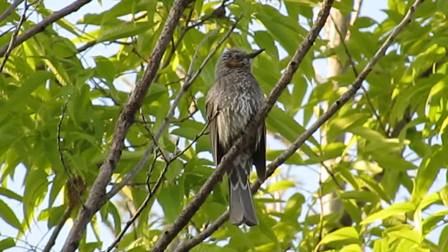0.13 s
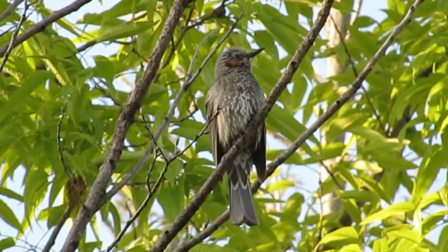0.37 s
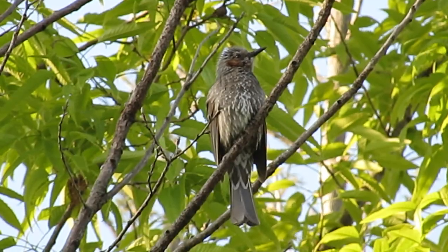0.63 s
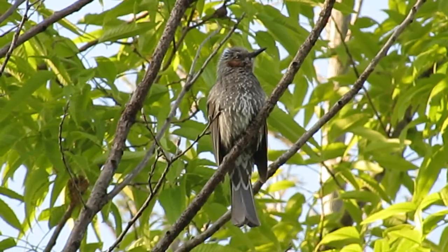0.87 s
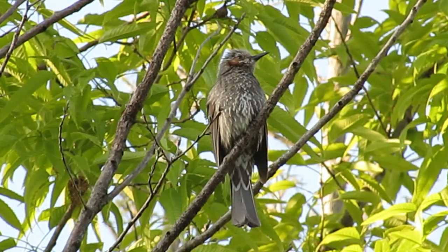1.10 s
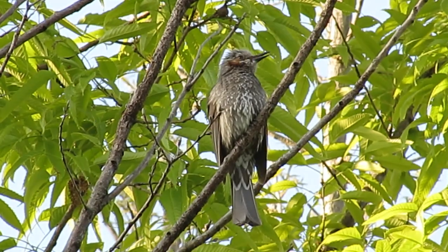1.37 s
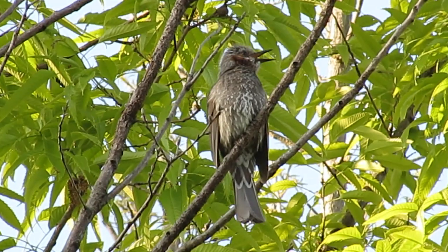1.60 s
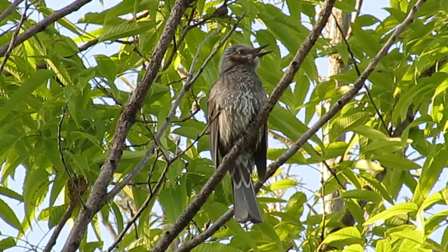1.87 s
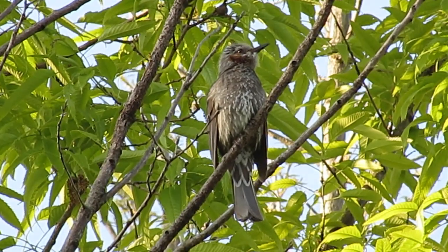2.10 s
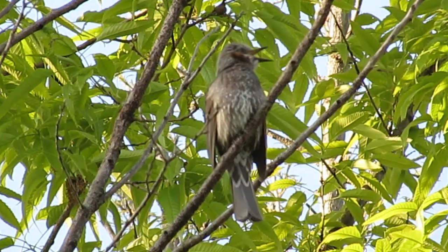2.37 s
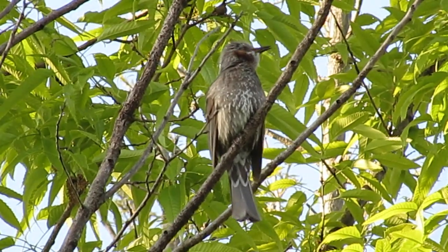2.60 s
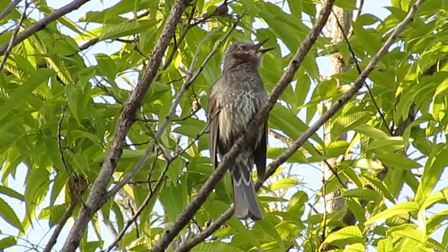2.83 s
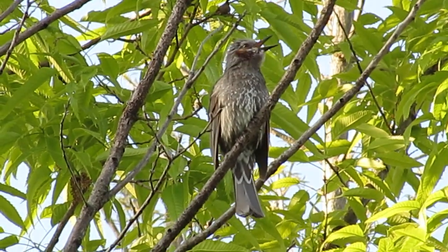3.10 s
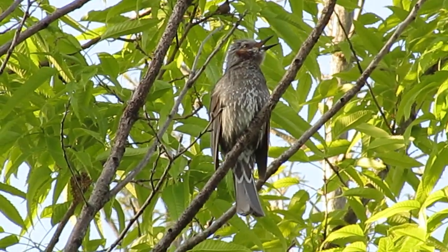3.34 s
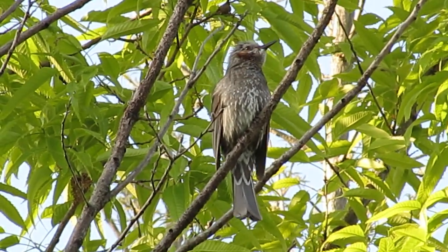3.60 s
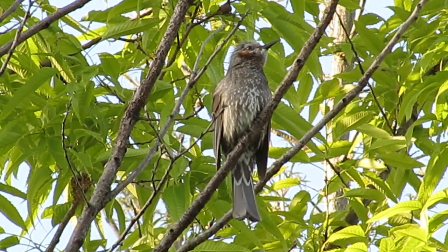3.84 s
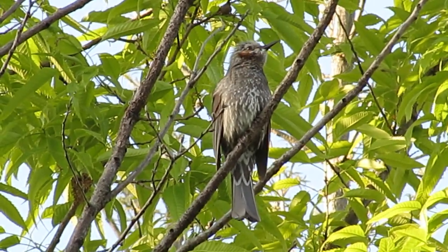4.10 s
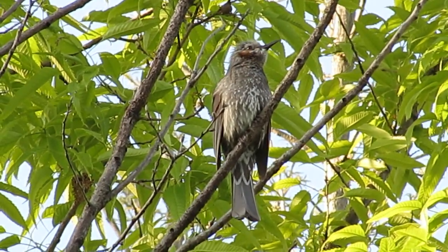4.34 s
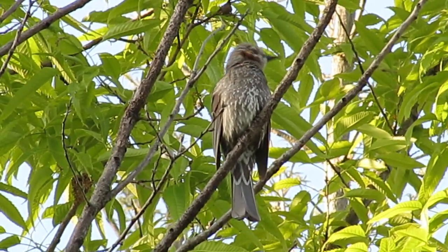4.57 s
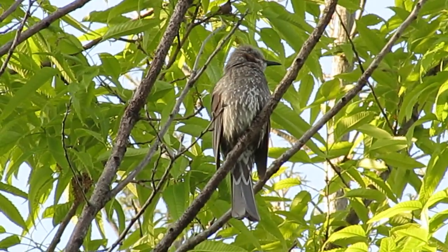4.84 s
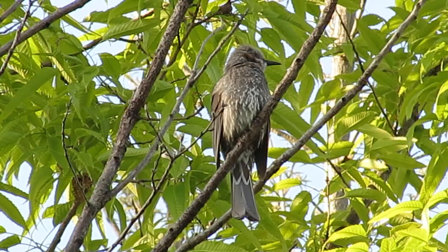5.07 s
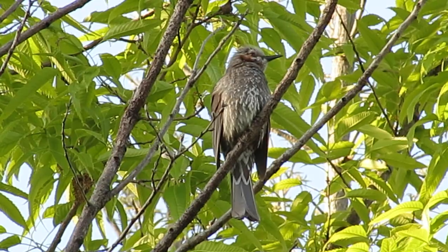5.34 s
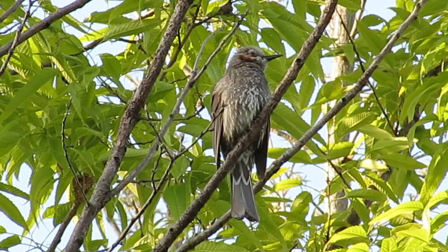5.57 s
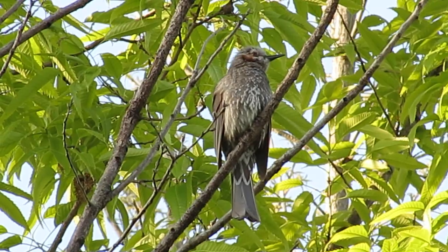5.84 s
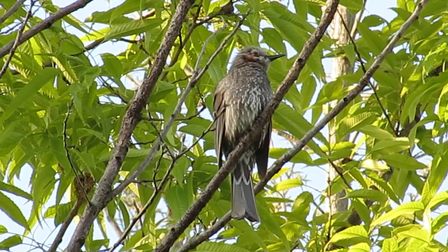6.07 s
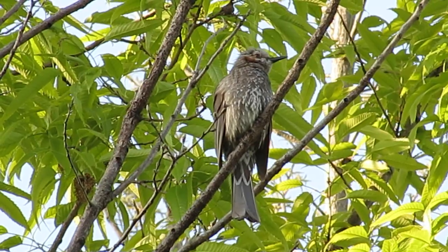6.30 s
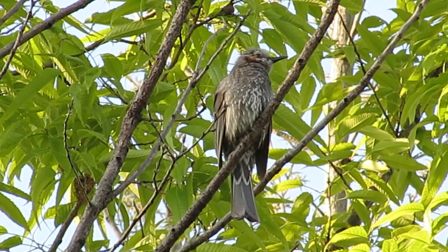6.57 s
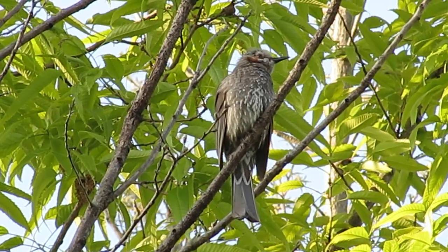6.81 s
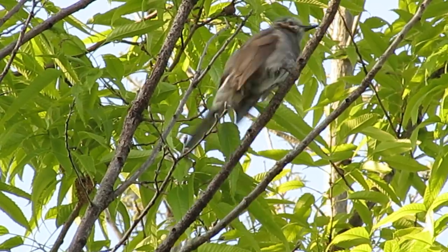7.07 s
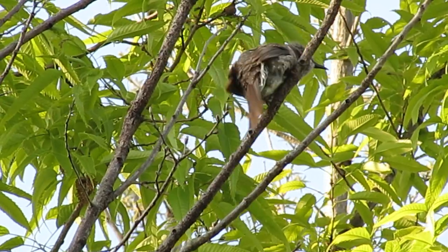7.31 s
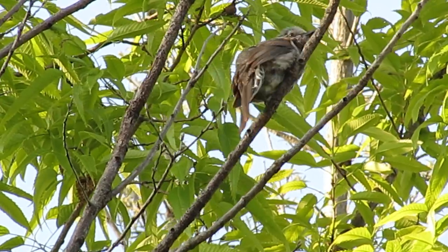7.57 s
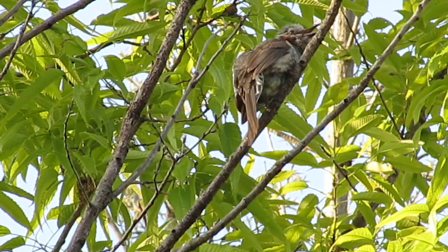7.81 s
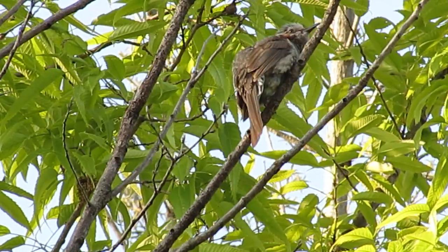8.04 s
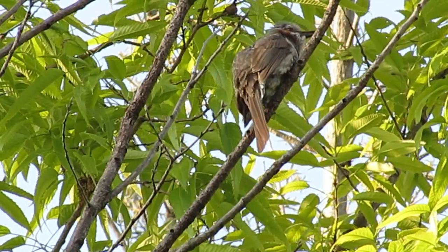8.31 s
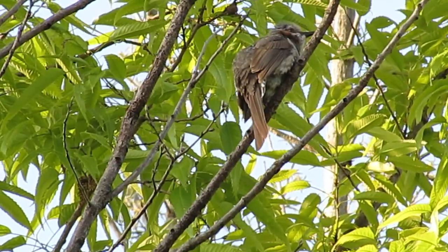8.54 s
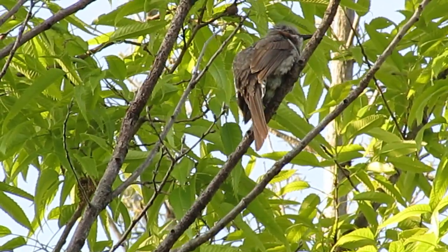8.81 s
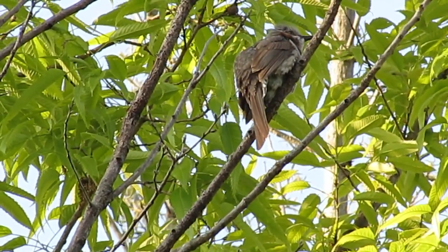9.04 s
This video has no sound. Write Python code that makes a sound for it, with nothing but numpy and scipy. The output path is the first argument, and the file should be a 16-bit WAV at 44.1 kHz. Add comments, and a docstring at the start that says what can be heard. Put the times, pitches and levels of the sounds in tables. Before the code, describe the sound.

A close songbird gives arching cries, buzzy two-toned phrases and a fading trill while a second bird whistles, over faint low traffic hum.

```python
"""A songbird calls close by: arching cries, buzzy climbs, two-voiced notes, flourishes and a dying trill.
A second bird whistles low rattles and warbles, and far birds chip; each voice is a gliding sine with haze and overtones.
Trees and walls throw the calls back as sparse reflections that die away.
Shaped noise makes the traffic hum, its swells and the wind in the leaves; short noise bursts are knocks close by."""
import sys
import numpy as np
from scipy import signal
from scipy.fft import rfft, irfft
from scipy.io import wavfile
from scipy.ndimage import uniform_filter1d

SR = 44100
rng = np.random.default_rng(int(sys.argv[2]) if len(sys.argv) > 2 else 0)


def output_pcm(signal):
    """Save a mono or channel-first signal as 16-bit PCM at the path in sys.argv[1].

    Samples are clipped to [-1, 1] before scaling.
    """
    pcm = np.clip(np.atleast_2d(signal).T, -1, 1) * 32767
    wavfile.write(sys.argv[1], SR, np.round(pcm).astype(np.int16))


def boost_factor(decibels):
    """Convert a level in decibels to a linear amplitude factor."""
    exponent = np.asarray(decibels, float) / 20
    return 10 ** exponent


N = 404397

# Colour of the hum. Each row: frequency in Hz, relative level in dB.
HUM_COLOUR = [(15, -34), (25, 2), (75, -2.5), (144, -4), (228, -9.5), (949, -18), (1240, -22), (3370, -28),
              (10700, -39.5), (14400, -43.5), (15600, -49)]
# Stereo likeness of the noise beds. Each row: frequency in Hz, left-right correlation.
STEREO_LIKENESS = [(60, 0.4), (150, -0.55), (300, -0.51), (700, 0.058), (1600, 0.0036), (4000, -0.052),
                   (15000, -0.0072)]
# Stereo lean of the noise beds. Each row: frequency in Hz, left over right in dB.
STEREO_LEAN = [(60, 2), (240, 0.5), (950, 0.5), (3770, -1.5), (15000, 2)]
# Passing tyres. Each row: time in seconds, level in dB.
TYRE_LEVEL = [(0.0, -54), (0.76, -57), (2.14, -54), (2.35, -56), (2.63, -44), (2.99, -54.5), (3.22, -47),
              (3.37, -48.5), (3.7, -53), (4.57, -61), (5.23, -57.5), (7.51, -59.5), (8.12, -55.5),
              (8.61, -53), (9.17, -52.5)]
# Colour of the tyre hiss. Each row: frequency in Hz, relative level in dB.
TYRE_COLOUR = [(150, -14.5), (400, -2.5), (800, -6.5), (1300, -9), (2500, -17.5), (6000, -24),
               (15000, -32.5)]
# Wind in the leaves. Each row: time in seconds, level in dB.
WIND_LEVEL = [(0, -83.5), (1, -89), (2, -68), (3.6, -59), (4.2, -65.5), (6, -73), (7.4, -76), (8.5, -80),
              (8.7, -63.5), (9.17, -61)]
# Colour of the leaves. Each row: frequency in Hz, relative level in dB.
LEAF_COLOUR = [(1500, -22), (3500, 2.5), (7000, -6.5), (11000, -9), (15800, -19)]
# Swells of a narrow traffic band. Each row: peak time in seconds, peak level in dB, rise and fall in dB per second.
DRONE_SWELLS = [(.28, -52, 60, 23), (2.35, -50.5, 47, 8), (2.63, -48.5, 36, 20), (3.36, -44.5, 55, 66),
                (5.41, -64, 18, 13), (8.5, -51.5, 40, 30)]
# Colour of that band. Each row: frequency in Hz, relative level in dB.
DRONE_COLOUR = [(700, -20), (920, -5), (1030, -0.5), (1150, -10), (1500, -63)]
# Faint distant chips. Each row: start in seconds, start and end pitch in Hz, length in seconds, level in dB.
FAR_CHIPS = [(0.044, 2310, 2480, 0.064, -73), (0.076, 3260, 3440, 0.08, -67),
             (0.247, 3000, 2335, 0.065, -72), (0.317, 2300, 1990, 0.1, -71), (0.326, 4150, 4130, .03, -70),
             (0.465, 3140, 3540, 0.021, -70), (0.782, 2800, 2800, 0.023, -73),
             (4.143, 1250, 1260, 0.077, -62), (5.425, 3520, 3320, 0.027, -62.5),
             (5.909, 3940, 3440, 0.023, -62), (6.668, 3960, 3400, 0.0286, -72),
             (6.975, 3090, 3200, 0.012, -64), (7.239, 3290, 3340, 0.028, -61),
             (7.357, 3300, 3930, 0.033, -68.5), (8.475, 1530, 2890, 0.0123, -56)]
# Far call, one table a part. Each row: seconds after its start, pitch in Hz, relative level in dB.
FAR_CALL_PARTS = [
    [(0, 7030, 1), (.02, 6900, 0), (.05, 7430, 0)],
    [(.05, 6980, 1), (.09, 5550, 0.5), (.18, 5250, -8)],
    [(.09, 7100, 3.5), (.24, 6890, -10)],
]
# Far call cues. Each row: start in seconds, level in dB.
FAR_CALL_CUES = [(.71, -61.5), (8.86, -61.5)]
# Treble dims from call to call as the head turns. Each row: time in seconds, dB lost per kHz above 4 kHz.
HEAD_TURN = [(1.5, 2.14), (2.1, 1), (2.5, 2), (2.9, 0.44), (3.2, 0.17), (3.5, 1.15), (6.1, 1.5), (7.8, 2.8),
             (8.3, 3.2)]
# Decay off nearby leaves and branches. Each row: frequency in Hz, seconds to fall by 60 dB.
LEAF_DECAY = [(500, 0.1), (2500, 0.12), (6000, 0.13), (12000, 0.16)]
# Decay off far trees and walls. Each row: frequency in Hz, seconds to fall by 60 dB.
FAR_DECAY = [(500, 0.15), (2500, 0.72), (5000, 0.61), (10000, 0.043)]
# Knocks. Each row: start in seconds, body peak in dB, tick in dB relative to that peak,
# left over right in dB, dullness in dB per octave above 250 Hz.
KNOCK_HITS = [(1.02, -34, -23, -6.5, -4), (1.053, -24, -25, -4, 2.5), (1.653, -21, -34, -2, -2.5),
              (1.73, -26, -35, -1, 1.5), (2.31, -19.5, -28, -2, 6.5), (2.487, -26.5, -24, -7, -1.5),
              (2.629, -28, -18, -2, 1), (2.954, -32, -18, -15, 12), (2.981, -22.5, -19, -2, 8),
              (2.995, -32, -16, -1, 7), (3.017, -29.5, -20, -1.5, 8), (3.287, -30, -27, 3, 5.5),
              (6.527, -43, -7, 7, 7), (6.546, -38, -31, 4, 8), (8.513, -42.5, -32, 9, 10),
              (8.865, -49, 0, 2.5, 0)]
# Colour of a knock's body. Each row: frequency in Hz, relative level in dB.
KNOCK_COLOUR = [(88, -61), (150, -15), (524, -6), (791, -10), (1390, -3), (1640, -12.5), (2220, -13.5),
                (4000, -29), (5200, -59), (8800, -120)]
# Leaves or feathers shaken. Each row: time in seconds, level in dB.
RUSTLE_LEVEL = [(7.62, -65), (7.628, -57.5), (7.698, -55), (7.72, -63)]
# Arching cry. Each row: seconds after its start, pitch in Hz, relative level in dB.
ARCH_SHAPE = [(0, 987, -11), (.008, 1639, -2.5), (.015, 1800, -1), (.043, 2023, 0.5), (.085, 2218, -3),
              (.13, 2250, 3), (.195, 2100, -1.5), (.215, 1883, -1), (.225, 1432, -9), (.232, 1120, -14)]
# Arch cues. Each row: start in seconds, level in dB, time stretch, pitch factor.
ARCH_CUES = [(1.502, -38.5, 1.005, 1.007), (2.409, -36, 1.02, 1.015), (7.765, -36.5, .957, 1.01)]
# Arch overtones. Each row: multiple of the pitch, relative level in dB.
ARCH_OVERTONES = [(1, -42), (2, 2), (3, -12), (4, 0), (5, -15.5), (6, -12)]
# Rich rise that opens a flourish. Each row: seconds after its start, pitch in Hz, relative level in dB.
RISE_SHAPE = [(0, 1614, -16.5), (.013, 1808, -7), (.024, 2207, -17.5), (.04, 2634, -3.5)]
# Rise overtones. Each row: multiple of the pitch, relative level in dB.
RISE_OVERTONES = [(1, 0), (1.5, -7), (2, 2), (3, -4.5), (4, -12)]
# Quick glides of a flourish, one table a glide. Each row: seconds after its start, pitch in Hz, relative level in dB.
FLOURISH_GLIDES = [
    [(.04, 2750, 2.5), (.047, 4800, -5), (.059, 6250, 5), (.07, 7000, -2.5), (.09, 7030, -11),
     (.12, 7480, -15), (.146, 7450, -7)],
    [(.052, 2920, -18), (.063, 3200, -10), (.085, 3515, -1), (.105, 3718, 1.5), (.14, 3760, 0),
     (.158, 3750, -16), (.167, 3530, -12)],
    [(.142, 4050, -15), (.149, 4700, -15), (.157, 4840, -11)],
    [(.171, 6300, 7), (.174, 6100, 7), (.178, 4530, -7), (.182, 2440, -16), (.184, 1780, -14)],
    [(.189, 3840, -2), (.2, 4760, -1.3)],
    [(.204, 3175, -6), (.215, 2680, 7)],
    [(.22, 2430, -1), (.23, 3216, 5), (.243, 2940, -11), (.257, 3410, -2)],
]
# Flourish cues. Each row: start in seconds, level in dB, time stretch, pitch factor.
FLOURISH_CUES = [(1.913, -38, .918, 1.025), (8.203, -42.5, 0.99, .98)]
# Glide overtones. Each row: multiple of the pitch, relative level in dB.
GLIDE_OVERTONES = [(1, 1), (2, -15), (3, -20)]
# Lines held under the trill, one table a line. Each row: time in seconds, pitch in Hz, level in dB.
HELD_LINES = [
    [(6.12, 5450, -52), (6.201, 5660, -52), (6.3, 5500, -54), (6.551, 5480, -57.5), (6.78, 5490, -70)],
    [(6.29, 3450, -66.5), (6.44, 3510, -63)],
]
# Flick that opens a phrase. Each row: seconds after the phrase's start, pitch in Hz, relative level in dB.
FLICK_SHAPE = [(0, 2466, -8), (.007, 2620, -1.5), (.016, 3320, -9.5)]
# Buzzy climb after the flick. Each row: seconds after the phrase's start, pitch in Hz, relative level in dB.
CLIMB_SHAPE = [(.02, 2260, -10), (.042, 2341, -2), (.052, 2500, -2), (.084, 3220, 2.5), (.11, 3340, 0.5),
               (.119, 3103, 1), (.121, 2920, -6), (.127, 1616, -2), (.129, 1350, 3)]
# Climb overtones. Each row: multiple of the pitch, relative level in dB.
CLIMB_OVERTONES = [(2, 2), (3, -29.5)]
# Held low side of the syrinx. Each row: seconds after the climb's end, pitch in Hz, relative level in dB.
LOW_SIDE_HOLD = [(0, 2300, -2.5), (.015, 2228, -5.5), (.034, 2230, -5)]
# Fall of the low side. Each row: seconds after the phrase's start, pitch in Hz, relative level in dB.
LOW_SIDE_FALL = [(.192, 1961, -1), (.201, 1826, -5.5), (.21, 1270, -5), (.212, 1220, -11)]
# High side of the syrinx. Each row: seconds after the low side's start, pitch in Hz, relative level in dB.
HIGH_SIDE_SHAPE = [(0, 3398, 8), (.03, 3300, 8.5), (.045, 3310, -1), (.062, 3230, -42)]
# Phrase cues. Each row: start in seconds, level of the climb, low side and high side in dB, stretch of the held part.
PHRASE_CUES = [(2.775, -35, -43.5, -45, 0.89), (3.08, -34.5, -45, -43, 0.827),
               (3.385, -36.5, -47.5, -48, 1.16)]
# Sum tones of a phrase. Each row: multiple of the low side, multiple of the high side, relative level in dB.
DUET_SUMS = [(1, 0, -1.5), (2, 0, 6.5), (3, 0, -4), (0, 1, 1), (1, 1, -0.5), (0, 2, -27), (2, 1, 1.5),
             (1, 2, -8), (3, 1, -5.5), (2, 2, -23), (4, 1, -18), (3, 2, -22.5)]
# Low side of a two-voiced chirp. Each row: time in seconds, pitch in Hz, level in dB.
CHIRP_LOW_SIDE = [(5.985, 2070, -54), (6.009, 3150, -45.5), (6.025, 3594, -39.5), (6.056, 3330, -44),
                  (6.082, 3520, -48), (6.095, 3280, -55), (6.11, 3680, -57)]
# High side of the chirp. Each row: time in seconds, pitch in Hz, level in dB.
CHIRP_HIGH_SIDE = [(5.986, 4260, -72), (6.001, 4700, -58), (6.02, 4990, -58), (6.06, 4870, -53),
                   (6.11, 4790, -68)]
# Sum tones of the chirp. Each row: multiple of the low side, multiple of the high side, relative level in dB.
CHIRP_SUMS = [(1, 0, 0), (0, 1, -3), (2, 0, -4), (1, 1, 2), (3, 0, -19), (2, 1, -8)]
# Hooked and sliding whistles, one table a note. Each row: time in seconds, pitch in Hz, level in dB.
WHISTLE_NOTES = [
    [(1.82, 1702, -50), (1.839, 2385, -36.5), (1.853, 1600, -44), (1.88, 1607, -44), (1.92, 1964, -33),
     (1.937, 1966, -38), (1.945, 1880, -59)],
    [(2.05, 2793, -49), (2.084, 2750, -30), (2.1, 2617, -33), (2.13, 2550, -43), (2.141, 2498, -26.5),
     (2.173, 2410, -36), (2.2, 2360, -39.5), (2.24, 2284, -45)],
    [(2.607, 3020, -42), (2.622, 2933, -30), (2.644, 2715, -26.5), (2.67, 2404, -30.5),
     (2.685, 2055, -38.5)],
    [(3.065, 1750, -49), (3.08, 2290, -35), (3.091, 1860, -46), (3.101, 1647, -39.5), (3.129, 1553, -47),
     (3.16, 1776, -37.5), (3.19, 1685, -45)],
    [(5.492, 2700, -38), (5.507, 2720, -34.5), (5.538, 2453, -34), (5.557, 2250, -30.5), (5.6, 2300, -38),
     (5.65, 2323, -37), (5.69, 2318, -34.5), (5.715, 2126, -47.5)],
]
# Whistle overtones. Each row: multiple of the pitch, relative level in dB.
WHISTLE_OVERTONES = [(1, 1), (2, -40)]
# Level flutter of the whistles. Each row: time in seconds, flutter in dB.
FLUTTER_BY_TIME = [(2.1, 3), (2.44, 3.5), (2.6, 1.5), (5.4, 2), (5.5, 4.5)]
# Low rattled whistle. Each row: time in seconds, centre pitch in Hz, level in dB.
RATTLE_SHAPE = [(2.435, 1793, -46), (2.461, 1738, -35.5), (2.503, 1890, -39), (2.525, 2000, -51)]
# Opening swings of a warble. Each row: seconds after its start, pitch in Hz, relative level in dB.
WARBLE_OPENING = [(0, 1635, -24), (.0055, 3120, -9.5), (.012, 1755, -17.5), (.0185, 2954, -4.5),
                  (.025, 1930, -9.5), (.032, 2490, -2.5), (.046, 2452, 0)]
# Warble cues. Each row: start in seconds, level in dB, length in seconds, first dip in seconds after the start,
# seconds between dips, number of dips, closing pitch in Hz.
WARBLE_CUES = [(4.226, -33, .2, 0.062, 0.01, 3, 2139), (4.634, -30.5, 0.21, 0.064, 0.015, 4, 2018),
               (5.117, -30.5, 0.21, .068, .0155, 3, 2056)]
# Wide trill narrowing to one line. Each row: time in seconds, centre pitch in Hz, level in dB, swing in Hz.
TRILL_SHAPE = [(6.112, 7180, -48, 1350), (6.16, 7400, -42, 1160), (6.22, 7300, -43, 570),
               (6.3, 6750, -43, 170), (6.36, 6690, -46.5, 43), (6.57, 6350, -55.5, 23),
               (6.7, 6340, -54, 21), (6.76, 6270, -74, 20)]


def evened(x):
    """Scales to rms 1."""
    return x / np.sqrt(np.mean(x ** 2) + 1e-20)


def read(points, hz):
    """Reads a table on a log-frequency axis."""
    f, value = np.transpose(points)
    return np.interp(np.log(hz + 1), np.log(f + 1), value)


def coloured(x, spectrum):
    """Filters x through a table of gains over frequency."""
    return irfft(rfft(x) * boost_factor(read(spectrum, np.fft.rfftfreq(len(x), 1 / SR))), len(x))


def add(mix, s, sound, pan_db=0):
    """Mixes a sound in at time s, with the left louder than the right by pan_db."""
    part = mix[:, round(s * SR):][:, :len(sound)]
    part += boost_factor([[pan_db / 2], [-pan_db / 2]]) * sound[:part.shape[1]]


def wobble(size, hz):
    """Random drift of about rms 1, with changes up to about hz."""
    span = int(SR / hz) + 1
    noise = rng.standard_normal(1 << 15)
    return evened(uniform_filter1d(uniform_filter1d(noise, span), span))[:size]


def columns(rows, s0=None, s1=None):
    """Time and the smoothed columns of a table at sample rate."""
    s, *rest = np.transpose(rows)
    t = np.arange(s0 or s[0], s1 or s[-1], 1 / SR)
    return [t] + [uniform_filter1d(np.interp(t, s, c), size=90, mode="nearest") for c in rest]


def placed(shape, s, db, stretch=1, pitch=1):
    """Moves a shape to time s and level db."""
    return [(s + stretch * after, pitch * hz, db + rel) for after, hz, rel in shape]


def soft_ends(t):
    """Fades in and out over 0.68 ms."""
    return np.clip(np.minimum(t - t[0], t[-1] - t) / 0.00068, 0, 1)


def wide_noise(spectrum, patchy_db):
    """Random short-time spectra with drifting patches, partly alike in both channels, at rms 1."""
    frames, hz = N // 256 + 5, np.fft.rfftfreq(1024, 1 / SR)
    a, b, c, d, patches = rng.standard_normal((frames, 513, 5)).T
    patches = uniform_filter1d(patches, size=10, axis=0)
    patches = evened(uniform_filter1d(patches, size=16, axis=1))
    same = np.clip(read(STEREO_LIKENESS, hz), -1, 1)[:, None]
    left, other = a + 1j * b, c + 1j * d
    z = np.array([left, same * left + np.sqrt(1 - same ** 2) * other])
    z *= boost_factor(read(spectrum, hz)[:, None] + patchy_db * patches)
    z *= boost_factor(read(STEREO_LEAN, hz) * np.array([[.5], [-.5]]))[:, :, None]
    return evened(signal.istft(z, nperseg=1024, noverlap=768)[1][:, :N])


def background():
    """A steady hum, a narrow swelling traffic band, the hiss of passing tyres and wind in the leaves."""
    t = np.arange(N) / SR
    tyre_db = np.interp(t, *np.transpose(TYRE_LEVEL))
    wind_db = np.interp(t, *np.transpose(WIND_LEVEL))
    swells = [db - np.maximum(rise * (s - t), fall * (t - s)) for s, db, rise, fall in DRONE_SWELLS]
    drone_db = np.maximum(np.max(swells, axis=0), -78.5)  # never quieter than this floor
    hum = boost_factor(-48) * wide_noise(HUM_COLOUR, 1.18)
    drone = boost_factor(drone_db) * wide_noise(DRONE_COLOUR, 0.47)
    tyres = boost_factor(tyre_db) * wide_noise(TYRE_COLOUR, 1.66)
    leaves = boost_factor(wind_db) * wide_noise(LEAF_COLOUR, 5.0)
    return hum + drone + tyres + leaves


def sing(t, hz, db, flutter_db, jitter, rasp_db=-20):
    """One membrane tone that wavers in pitch and level, inside a haze of turbulent air."""
    turns = np.cumsum(hz * (1 + jitter * wobble(len(t), 450))) / SR
    dim_db = np.interp(t[0], *np.transpose(HEAD_TURN)) * np.maximum(hz / 1000 - 4, 0)
    mean_lift_db = flutter_db ** 2 * np.log(10) / 20  # offsets the power that flutter adds
    level = boost_factor(db - dim_db + flutter_db * wobble(len(t), 315) - mean_lift_db)
    level = level * (hz < 16000)
    haze = 1 + boost_factor(rasp_db) * wobble(len(t), 2500)
    return np.sqrt(2) * level * haze * soft_ends(t) * np.sin(2 * np.pi * (turns + rng.random()))


def note(rows, tones, flutter_db, jitter, rasp_db, puff_db, buzz=0):
    """A harmonic note; air puffs out when the pitch jumps, and buzz shakes the upper part of a climb."""
    t, hz, db = columns(rows)
    jump = np.clip(abs(np.gradient(np.log(hz))) * SR / 60, .1, 1)
    puff = boost_factor(db + puff_db) * jump * soft_ends(t) * wobble(len(t), 15000)
    climbing = np.gradient(hz) > -.05
    shaking = np.clip(hz / 2330 - 1, 0, .15) / 0.22 * climbing  # sets in above 2330 Hz
    shake = uniform_filter1d(shaking, size=200) * np.sin(2 * np.pi * 238 * t)  # 238 Hz
    hz = hz * (1 + buzz * shake)
    voice = sum(sing(t, k * hz, db + rel, flutter_db, jitter, rasp_db) for k, rel in tones)
    return t[0], np.diff(puff, prepend=0) + voice


def distant_birds():
    """Hazy far calls and short chips, each a single wavering tone."""
    mix = np.zeros((2, N))
    calls = [placed(part, *cue) for cue in FAR_CALL_CUES for part in FAR_CALL_PARTS]
    chips = [[(s, hz0, db - 4.5), (s + length / 2, (hz0 + hz1) / 2, db), (s + length, hz1, db - 3)]
             for s, hz0, hz1, length, db in FAR_CHIPS]
    for rows in calls + chips:
        add(mix, *note(rows, [(1, 0)], 2.1, 0.011, -3.5, -60))
    return mix


def echoes(x, t60, shared):
    """Sparse reflections of random sign die band by band; three random tails fade in and out in turn to avoid ringing."""
    hz, t, _ = signal.stft(np.zeros(SR), SR, nperseg=128)
    decay = boost_factor(-60 * t / read(t60, hz)[:, None])
    out = 0
    for k in range(3):
        taps = np.zeros((3, SR))  # left, right and shared reflections
        at = np.arange(120, SR - 20, 20) + rng.integers(0, 20, (3, (SR - 121) // 20))
        np.put_along_axis(taps, at, rng.choice([-1., 1.], at.shape), 1)
        z = signal.stft(taps[:2] + shared * taps[2], SR, nperseg=128)[2]
        tail = signal.istft(z * decay, SR, nperseg=128)[1]
        tail = tail / np.linalg.norm(tail[0])
        turn = np.sqrt(2 / 3) * np.cos(np.pi * (7 * np.arange(N) / SR + k / 3))
        out = out + signal.fftconvolve((x.mean(0) * turn)[None], tail, axes=1)[:, :N]
    return out


def knocks():
    """Short noise bursts with a tick at the start, each microphone port shaking in its own way; also a rustle."""
    mix, t = np.zeros((2, N)), np.arange(2048) / SR
    fade = np.exp(-(t / 0.011) ** 2) * np.minimum(t * 2000, 1)
    shape = fade * (1 + 0.62 * np.exp(-t / 0.00084))
    noises = rng.standard_normal((len(KNOCK_HITS), 2, 2048))
    for (s, db, tick_db, pan_db, dull_db), noise in zip(KNOCK_HITS, noises):
        ports = np.array([noise[0], 0.8 * noise[1] - 0.18 * noise[0]])
        colour = [(hz, rel - dull_db * np.log2(max(hz, 250) / 250)) for hz, rel in KNOCK_COLOUR]
        body = np.array([coloured(port, colour) for port in ports]) * shape
        tick = evened(np.diff(ports[0], prepend=0)) * np.exp(-t / 0.0029)
        level = boost_factor(db + np.array([[pan_db / 2], [-pan_db / 2]]))
        mix[:, round(s * SR):][:, :2048] += level * (body / abs(body).max() + boost_factor(tick_db) * tick)
    t, db = columns(RUSTLE_LEVEL)
    rustle = coloured(rng.standard_normal(len(t)), [(900, -40), (1500, 12), (3000, 4.0), (4500, -24.5)])
    add(mix, t[0], boost_factor(db) * evened(rustle) * signal.windows.tukey(len(t), .3))
    return mix


def near_bird():
    """Membrane tones in arches, flourishes, three-part phrases, a two-voiced chirp and the trill."""
    mix = np.zeros((2, N))
    glides = HELD_LINES + [placed(part, *cue) for cue in FLOURISH_CUES for part in FLOURISH_GLIDES]
    for cue in ARCH_CUES:
        add(mix, *note(placed(ARCH_SHAPE, *cue), ARCH_OVERTONES, 1.2, 0.0056, -57.0, 2.1), pan_db=2.5)
    for cue in FLOURISH_CUES:
        add(mix, *note(placed(RISE_SHAPE, *cue), RISE_OVERTONES, 0.44, 0.0011, -18, -8), pan_db=3.0)
    for rows in glides:
        add(mix, *note(rows, GLIDE_OVERTONES, 0.72, 0.0085, -19, 2), pan_db=2.0)
    for s, climb_db, low_db, high_db, stretch in PHRASE_CUES:
        flick = placed(FLICK_SHAPE, s, climb_db)
        climb = placed(CLIMB_SHAPE, s, climb_db)
        hold = placed(LOW_SIDE_HOLD, s + CLIMB_SHAPE[-1][0], low_db, stretch)
        low = hold + placed(LOW_SIDE_FALL, s, low_db)
        high = placed(HIGH_SIDE_SHAPE, low[0][0], high_db, stretch)
        add(mix, *note(flick, GLIDE_OVERTONES, 1.1, 0.0066, -7, -1), pan_db=-2.0)
        add(mix, *note(climb, CLIMB_OVERTONES, 1.9, 0.0071, -18, 1.5, buzz=0.048), pan_db=1.0)
        add(mix, *duet(low, high, DUET_SUMS, 2.14, 0.0076), pan_db=1.5)
    add(mix, *duet(CHIRP_LOW_SIDE, CHIRP_HIGH_SIDE, CHIRP_SUMS, 2.4, .016), pan_db=2.0)
    add(mix, *trill(), pan_db=3.0)
    return mix


def whistler():
    """A second bird, nearly pure in tone, with a thin hiss high above."""
    mix = np.zeros((2, N))
    for rows in WHISTLE_NOTES + [rattle()] + [warble(*cue) for cue in WARBLE_CUES]:
        flutter_db = np.interp(rows[0][0], *np.transpose(FLUTTER_BY_TIME))
        add(mix, *note(rows, WHISTLE_OVERTONES, flutter_db, 0.0055, -30.5, -62), pan_db=-2.0)
        t, _, db = columns(rows)
        hiss = sing(t, 10800 + 0 * t, db - 36, 2, 0.0316, 6.1)
        add(mix, t[0], hiss)
    return mix


def rattle():
    """The pitch of a low whistle bounces in quick scallops; the dips are quieter."""
    t, hz, db = columns(RATTLE_SHAPE)
    bounce = np.cos(2 * np.pi * 73.8 * (t - t[0]))  # 73.8 Hz
    return np.transpose([t, hz * (1 + 0.058 * bounce), db + 3 * bounce])


def duet(low, high, tones, flutter_db, jitter):
    """Two voices mix in the windpipe; a sum tone follows the levels of both and ends with either."""
    t, low_hz, low_db = columns(low)  # the low side sets the span
    ended = (high[-1][0] + 0.0063, high[-1][1], -95)
    _, high_hz, high_db = columns(high + [ended], low[0][0], low[-1][0])
    return t[0], sum(sing(t, m * low_hz + n * high_hz, (m * low_db + n * high_db) / (m + n) + rel, flutter_db, jitter)
                     for m, n, rel in tones)


def warble(start, db, length, first, step, dips, close_hz):
    """Opening swings, a hold, a shake whose dips grow shallower, a crest and a slide to the closing note."""
    shake = [(first - 0.0095, 2430, 0)]  # the held pitch in Hz, until 9.5 ms before the first dip
    for k, u in enumerate(np.linspace(0, 1, round(dips))):
        dip_hz = close_hz * (.92 + (1.14 - .92) * u ** 2)
        peak_hz = close_hz * (1.25 + (1.34 - 1.25) * u)
        shake += [(first + k * step, dip_hz, -8 * (1 - u / 2)),
                  (first + (k + .5) * step, peak_hz, -1.5)]
    crest = (.12, close_hz * 1.27, 0.5)
    close = [crest, (.152, close_hz, -5), (length - .008, close_hz, -5), (length, close_hz, -4)]
    return placed(WARBLE_OPENING + shake + close, start, db)


def trill():
    """The pitch swings in sharp V shapes that shrink, roughest while wide; a sum tone rides a held pitch above it."""
    t, hz, db, swing = columns(TRILL_SHAPE)
    shape = 2 * abs(np.cos(np.pi * 50.5 * (t - t[0]))) ** 1.2 - 1  # 50.5 swings per second
    wide, pitch = swing / hz, hz + swing * shape
    tone = sing(t, pitch, db - 16 * shape * wide, 1.5, 0.0024 + 0.091 * wide, -18 + 90 * wide)
    sum_tone = sing(t, pitch + 5480, db - 21 - 50 * wide, 3, 0.00384)  # mixed with a line held below
    return t[0], tone + sum_tone


def scene():
    """Birds and knocks, their reflections off leaves and off far trees and walls, and the background."""
    near, second, far, taps = near_bird(), whistler(), distant_birds(), knocks()
    scattered = boost_factor(-2.5) * near + boost_factor(-3) * second + boost_factor(5.0) * far + taps / 10
    echoed = near / 5 + boost_factor(-15.5) * second + boost_factor(-8) * far + taps / 20
    direct = near + second + far + taps
    return direct + echoes(scattered, LEAF_DECAY, 0.68) + echoes(echoed, FAR_DECAY, 0.61) + background()


def roll_off(x):
    """The treble ends steeply here."""
    return signal.sosfilt(signal.butter(12, 15790, fs=SR, output="sos"), x)


def record(dry):
    """The microphone drops the lowest bass, below 40 Hz."""
    low_cut = signal.butter(2, 40, "high", fs=SR, output="sos")
    return roll_off(signal.sosfilt(low_cut, dry))


dry = scene()
out = record(dry)
output_pcm(out)
```